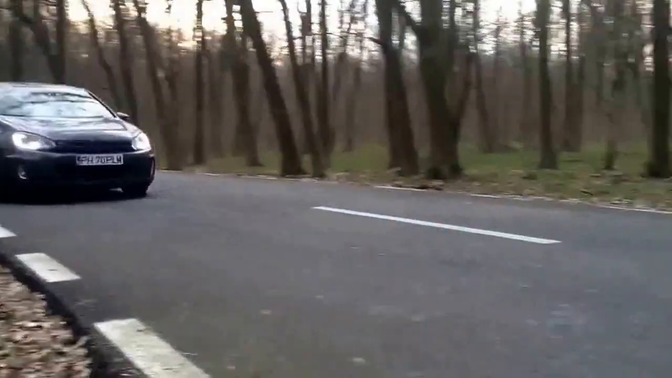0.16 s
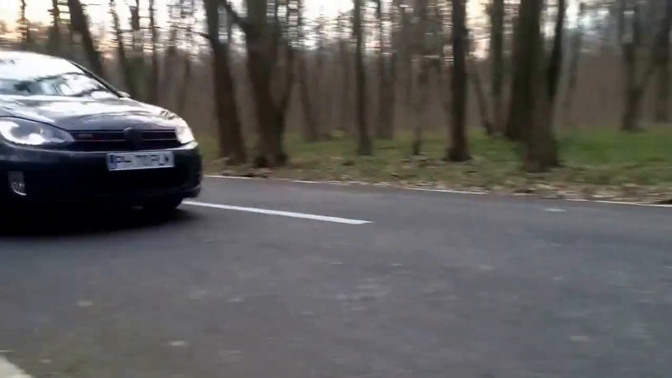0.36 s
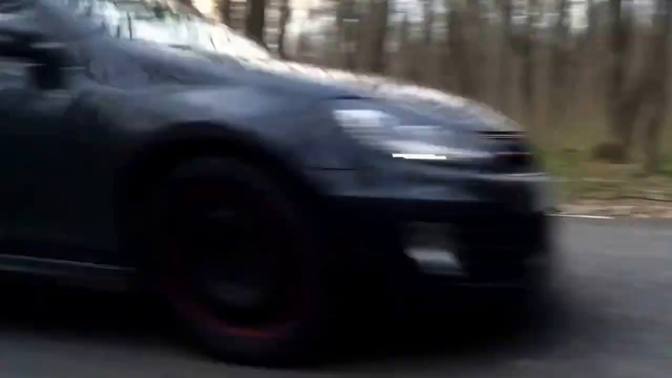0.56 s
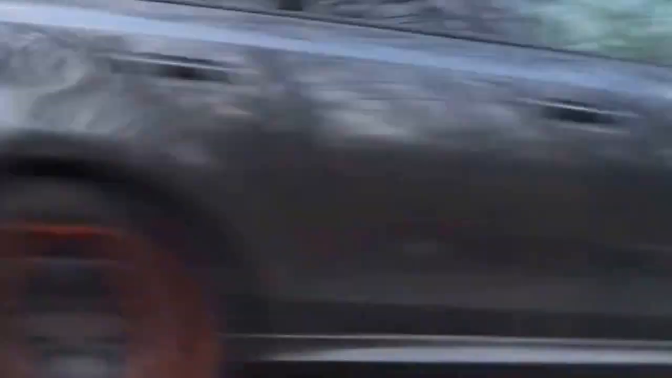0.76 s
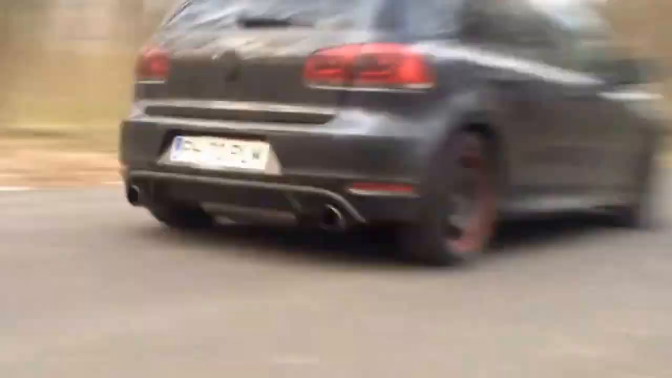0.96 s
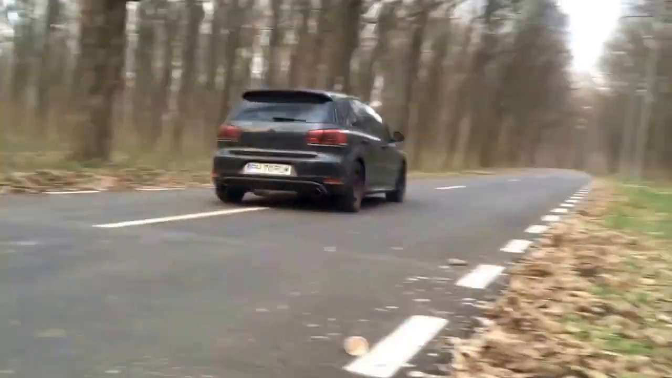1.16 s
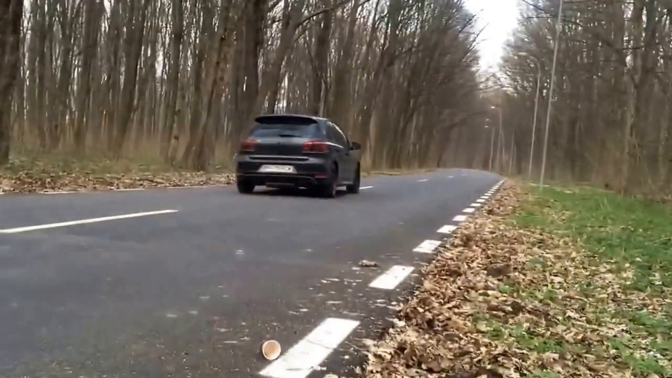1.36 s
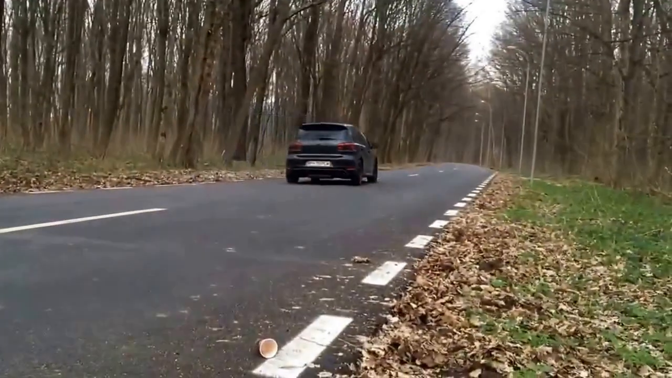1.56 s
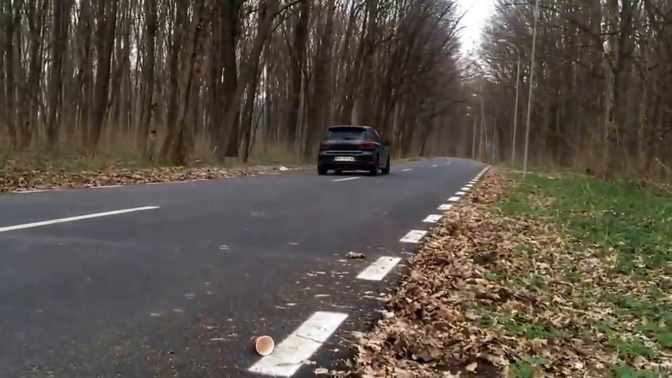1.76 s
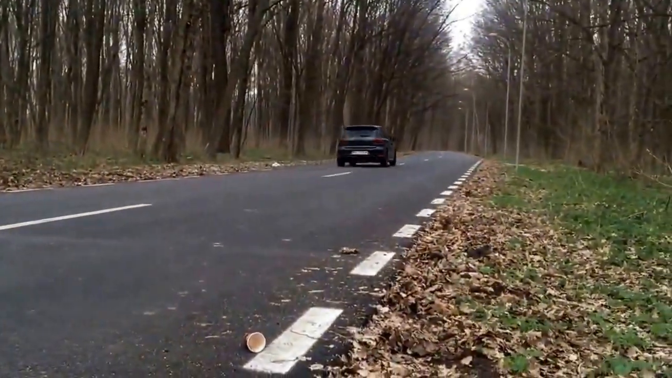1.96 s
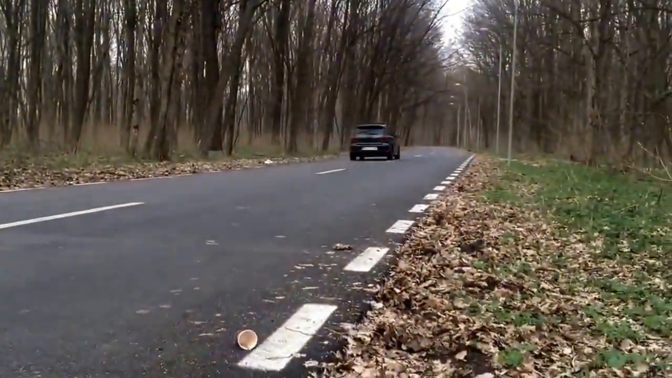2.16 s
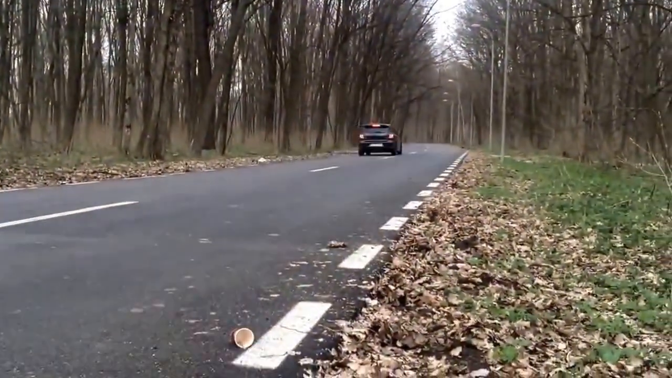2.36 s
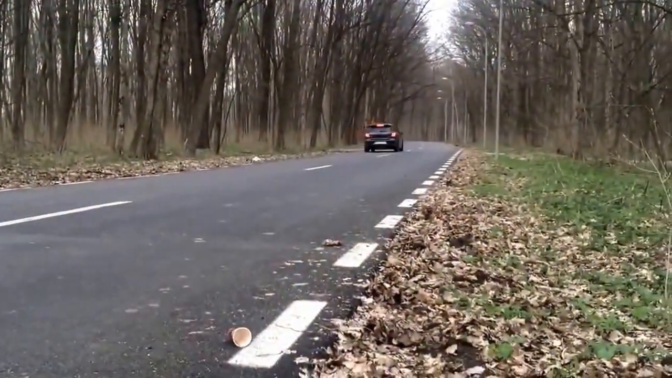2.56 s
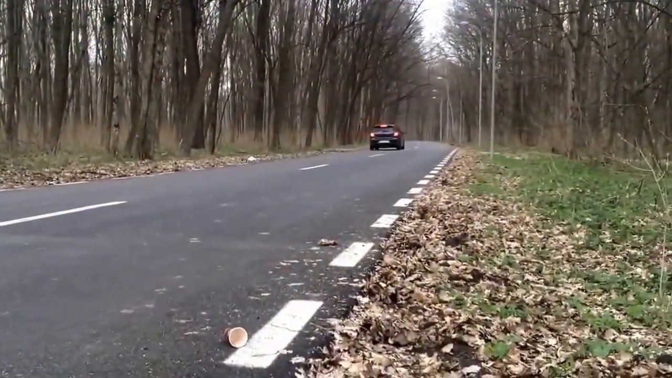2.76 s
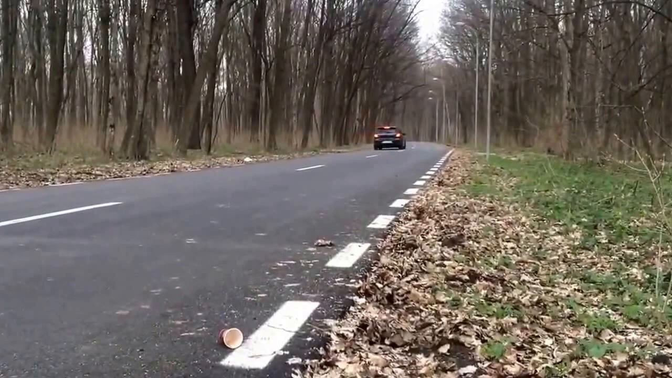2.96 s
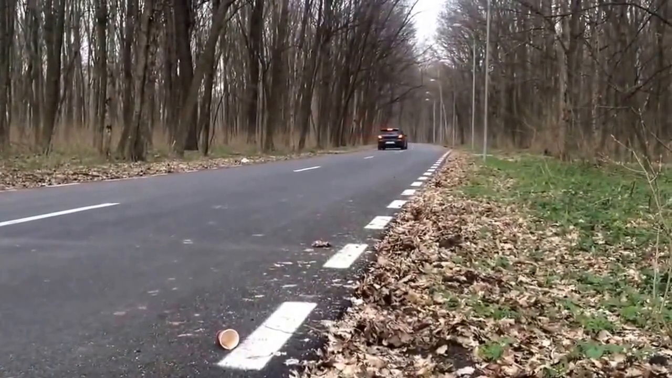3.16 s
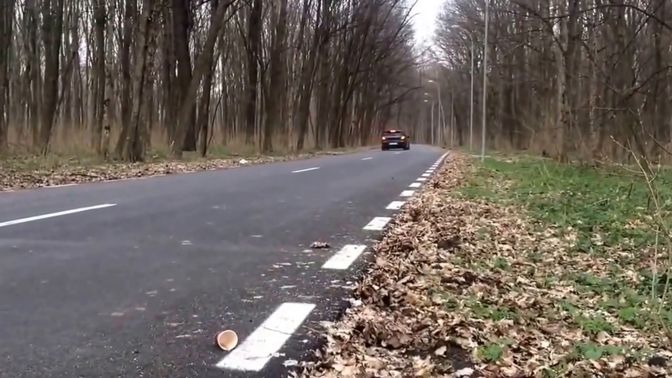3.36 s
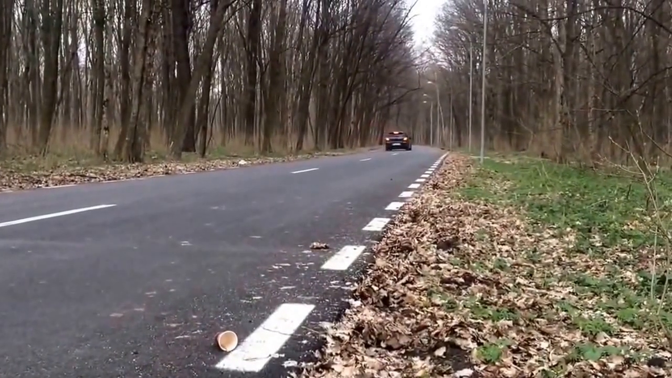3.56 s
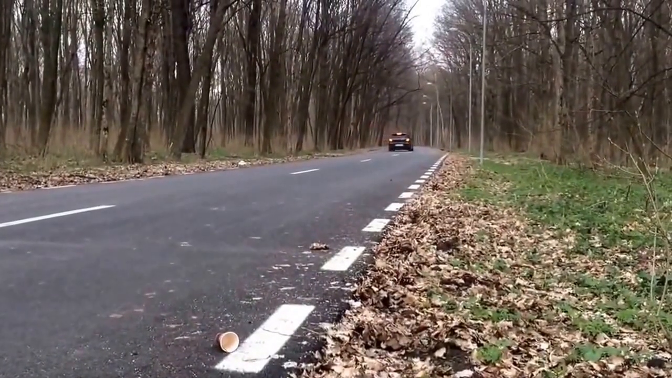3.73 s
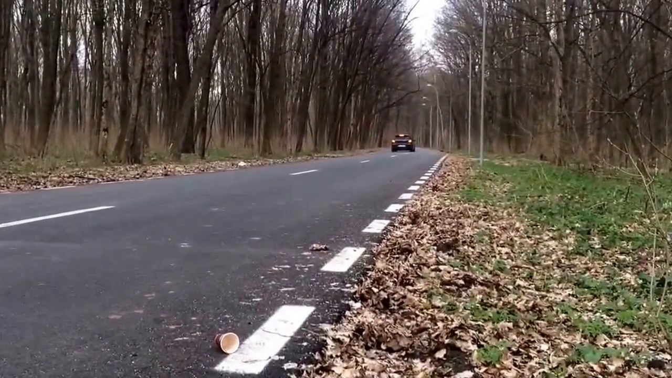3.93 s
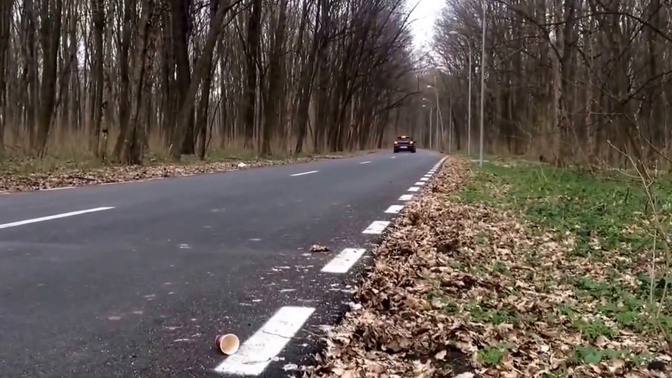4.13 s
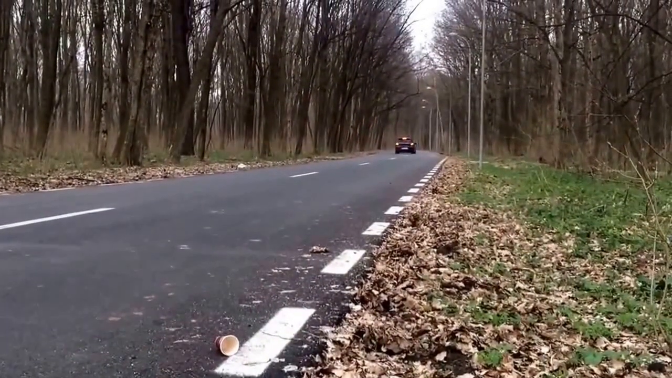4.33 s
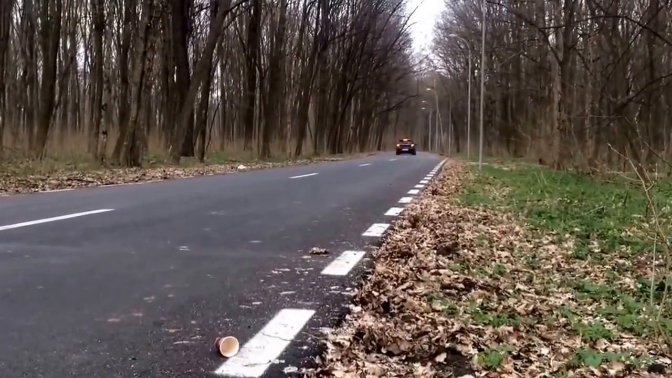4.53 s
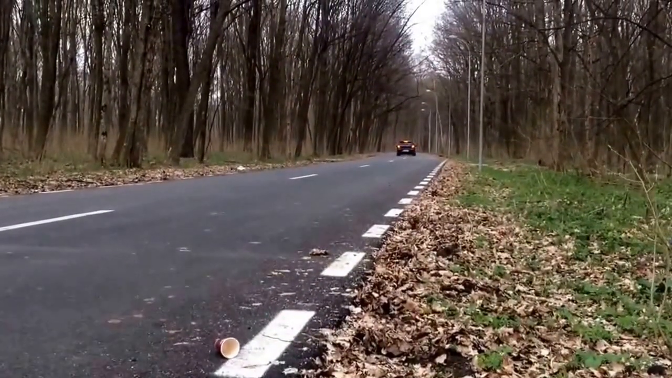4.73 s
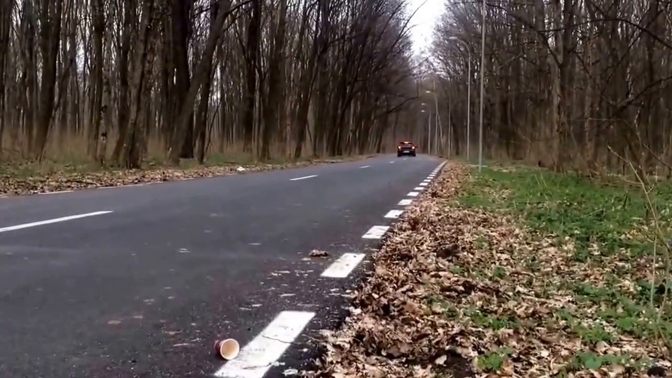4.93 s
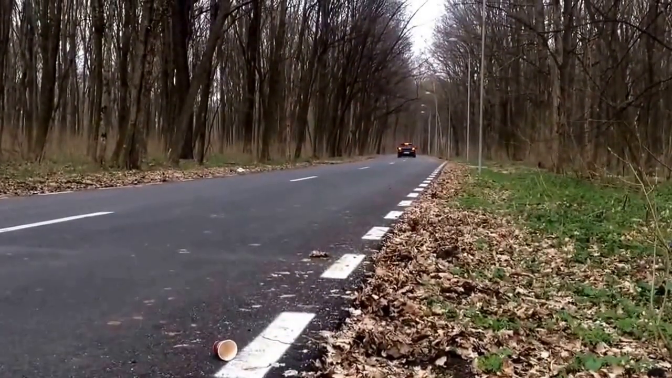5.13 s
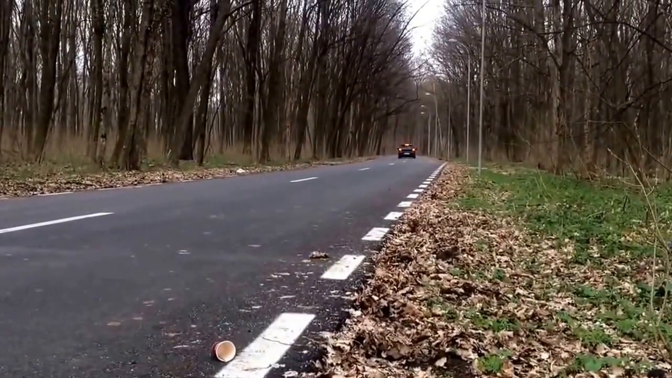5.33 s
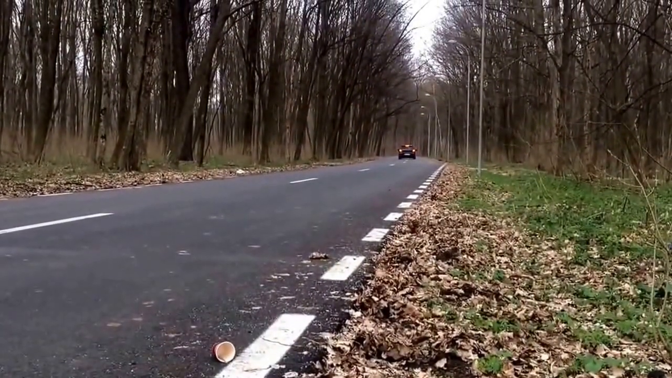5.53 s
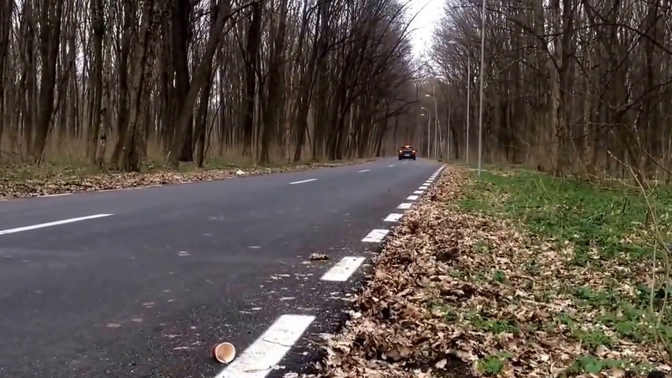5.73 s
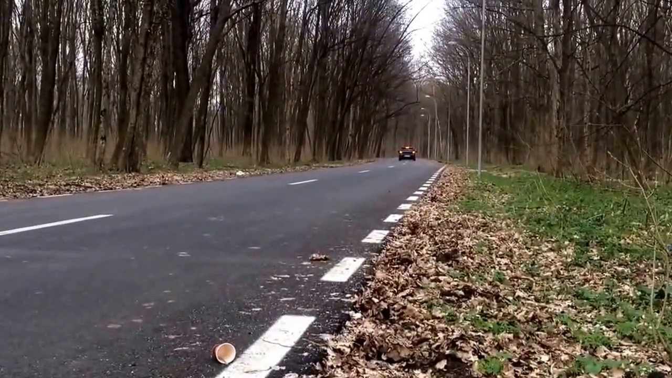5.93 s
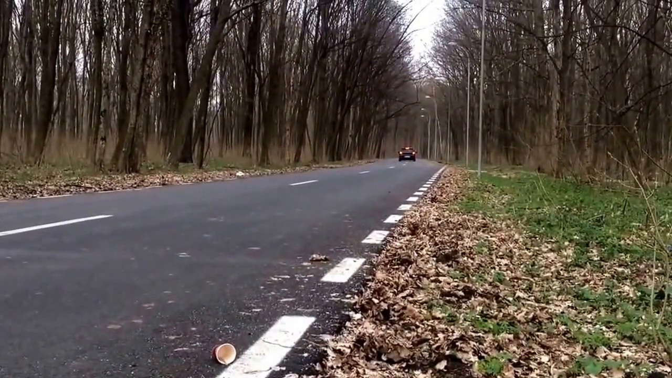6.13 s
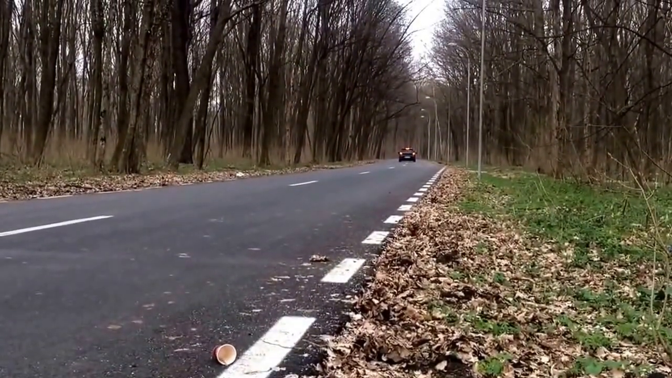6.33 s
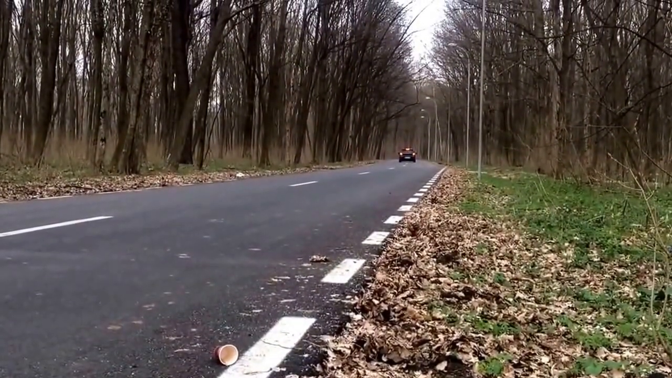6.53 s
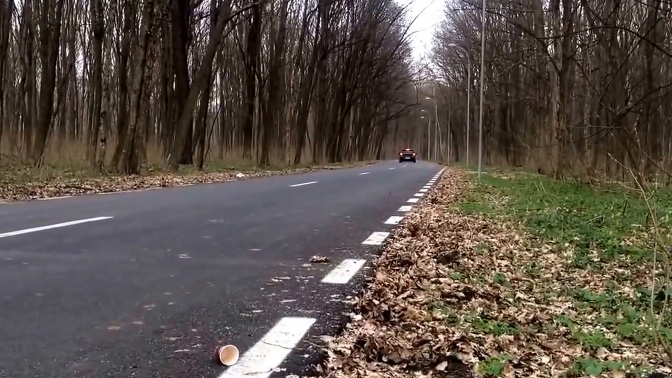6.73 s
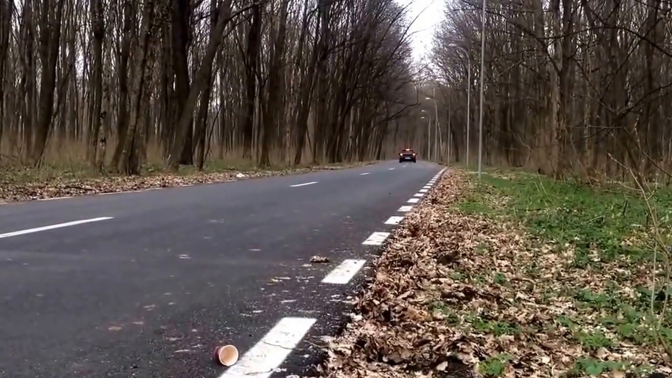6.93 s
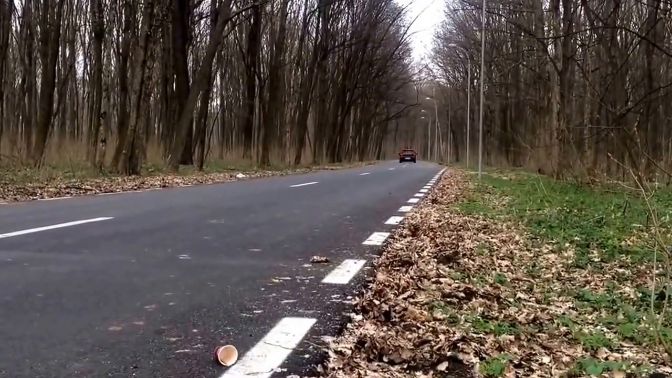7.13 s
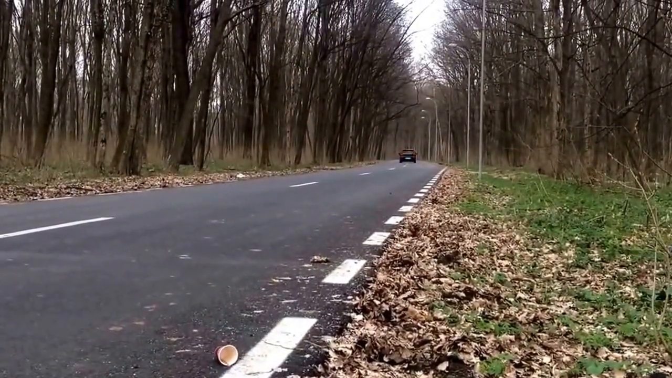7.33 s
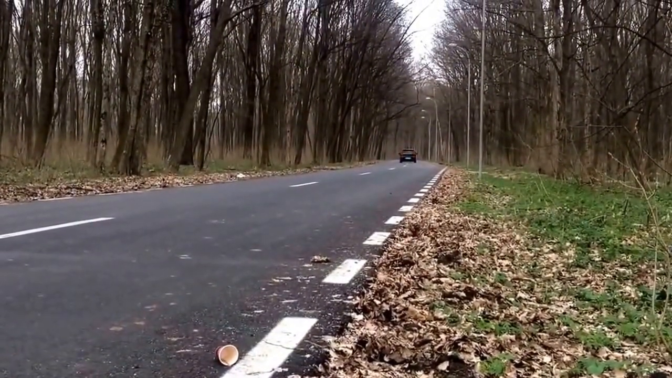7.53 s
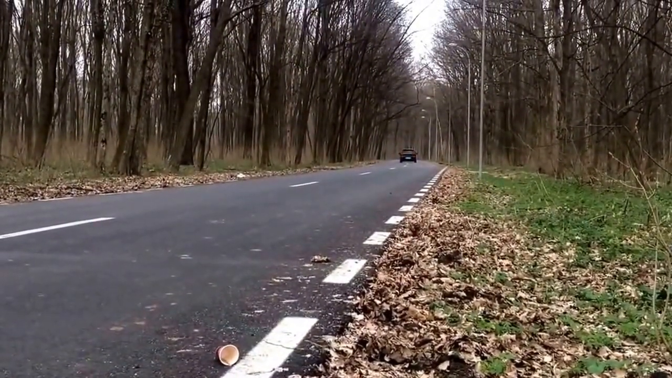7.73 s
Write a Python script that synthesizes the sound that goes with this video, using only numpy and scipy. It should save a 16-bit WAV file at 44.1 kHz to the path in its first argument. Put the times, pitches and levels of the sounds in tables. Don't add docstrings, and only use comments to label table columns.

```python
import sys
import numpy as np
from scipy import signal
from scipy.io import wavfile

SR = 44100
rng = np.random.default_rng(int(sys.argv[2]) if len(sys.argv) > 2 else 0)


def to_wav(s):
    ch = np.atleast_2d(s).T
    pcm = np.round(np.clip(ch, -1, 1) * 32767)
    wavfile.write(sys.argv[1], SR, pcm.astype(np.int16))


def rack_gain(trim_db):
    fader = np.asarray(trim_db, float)
    return 10 ** (fader / 20)


N = 347940


def in_time(rows):
    s, *columns = np.transpose(rows)
    return [np.interp(np.arange(N) / SR, s, c) for c in columns]


def at_hz(points, hz):
    points_hz, points_db = np.transpose(points)
    return np.interp(np.log(hz), np.log(points_hz), points_db)


def window(start_s, end_s, attack_s, release_s):
    t = np.arange(N) / SR
    return np.clip((t - start_s) / attack_s, 0, 1) * np.clip((end_s - t) / release_s, 0, 1)


def rms_one(x):
    return x / np.sqrt(np.mean(x ** 2) + 1e-20)


def drift(rate_hz):
    r = np.exp(-80 * np.pi * rate_hz / SR)
    white = rng.standard_normal(N // 40 + 2002)
    slow = signal.lfilter([1], [1, -2 * r, r * r], white)[2000:]
    return np.interp(np.arange(N) / 40, np.arange(len(slow)), rms_one(slow))


def butter(x, hz, kind, order=2):
    return signal.sosfilt(signal.butter(order, hz, kind, fs=SR, output="sos"), x)


def bands(spectrum):
    low_hz, high_hz = spectrum[0][0], spectrum[-1][0]
    edges = np.geomspace(low_hz, min(high_hz, 17000), round(3 * np.log2(high_hz / low_hz)))
    white = rng.standard_normal((2, N))
    out = []
    for k, (a, b) in enumerate(zip(edges, edges[1:])):
        hz = np.sqrt(a * b)
        out.append((hz, rack_gain(at_hz(spectrum, hz)) * butter(white[k % 2], [a, b], "band")))
    power = sum(np.mean(band ** 2) for hz, band in out)
    return [(hz, band / np.sqrt(power)) for hz, band in out]


# time_s, firings_per_s
ENGINE_SPEED = [(0, 133), (.14, 161), (.28, 179.7), (.378, 188), (.53, 173), (.56, 149.8), (.655, 145.6),
                (.76, 153.5), (.967, 132.7), (1.24, 128), (1.377, 129), (1.51, 132), (1.63, 130),
                (1.95, 103), (2.25, 88), (2.68, 95), (3.06, 89.6), (5.3, 34)]
# time_s, level_db, fall_per_order_db
EXHAUST_EFFORT = [(0, -30.5, -8.5), (.28, -22, -9.5), (.4, -21, -6), (.658, -7.5, -5.5), (.74, -18, -6),
                  (.83, -13.5, -4.5), (.97, -14.5, -4.5), (1.02, -22, -4), (1.16, -17, -3.1),
                  (1.3, -20.5, -2.6), (1.37, -23.5, -12.5), (1.68, -26, -8.5), (1.85, -28, -9),
                  (2.0, -37, -10), (2.68, -37.5, -10.5), (3.76, -49, -4.5), (5.0, -49, -4),
                  (5.3, -61, -1.5)]
# start_s, end_s, level_db, fall_per_order_db
FIRING_CUTS = [
    (0.399, 0.659, -14.5, 3),
    (1.376, 1.661, -10.5, -20),
]
# freq_hz, gain_db
TAILPIPE = [(30, -4), (90, -0.5), (165, 1), (240, -4.5), (370, 1.5), (520, 0), (800, 2), (950, -25.5)]


def exhaust():
    cylinder_db, paired_db = np.array([.6, -.4, -.5, .3]), 3.5
    firing_s = .6585
    uneven, uneven_coming, uneven_coast = .21, .4, .19
    abreast_s, dip_speedup_hz_s2 = .8, 750
    echo_share, echo_depth = .67, 1.3
    t, (rate,), (level_db, fall_db) = np.arange(N) / SR, in_time(ENGINE_SPEED), in_time(EXHAUST_EFFORT)
    for start_s, end_s, cut_db, duller_db in FIRING_CUTS:
        cut = window(start_s, end_s, .04, .011)
        level_db = level_db + cut_db * cut
        fall_db = fall_db + duller_db * cut

    climb_hz_s = np.where(t < abreast_s, 3000, 230)
    dip_hz = 130 + np.abs(t - abreast_s) * climb_hz_s + dip_speedup_hz_s2 * (t - abreast_s) ** 2
    behind = window(1.09, 9, .12, 1)
    coast = window(1.9, 9, .4, 1)
    spread = np.where(t < FIRING_CUTS[0][0], uneven_coming, uneven + (uneven_coast - uneven) * coast)

    turns = np.cumsum(rate) / SR
    turns += 1 - turns[round(firing_s * SR)] % 1
    firings = np.arange(int(turns[-1]) + 2)
    draws = rng.standard_normal((2, 1000))
    strength_chance, time_chance = [spread * np.interp(turns, firings + .5, d[firings]) for d in draws]
    early_rad = .55 * time_chance
    pattern_db = np.interp(turns, firings + .5, cylinder_db[firings % 4])
    pattern_db = pattern_db + paired_db * np.sin(np.pi * turns) / 2
    out = 0
    for k in range(1, 10):
        sharp = min(k - .6, 1.9)
        strength = rack_gain(pattern_db * sharp) * (1 + strength_chance * sharp)
        road = np.abs(1 + echo_share * np.exp(1j * np.pi * k * rate / dip_hz)) / (1 + echo_share)
        coast_db = (k == 2) * 2.5 + (k > 2) * -3
        pipe_db = at_hz(TAILPIPE, k * rate) + coast * coast_db + (k == 2) * -8 * (behind - coast)
        order_level = rack_gain(level_db + fall_db * (k - 1) ** .89) * road ** echo_depth * rack_gain(pipe_db)
        wave = np.sin(k * (2 * np.pi * turns + early_rad))
        out = out - np.sqrt(2) * order_level * strength * wave
    out = out * window(-1, 5.45, 1, .15)

    puffs = rng.standard_normal(N) * np.exp(-3 * (turns % 1))
    rasp = rms_one(butter(puffs, (430, 880), "band", order=3))
    burble = rms_one(butter(puffs, (190, 350), "band", order=3))
    out = out + rack_gain(-27) * window(.75, 1.36, .25, .07) * rasp
    return out + rack_gain(-61) * window(3.8, 5.7, .5, .5) * burble


# freq_hz, density_db_per_hz
TREAD_SPECTRUM = [(120, -33), (200, -3), (358, -9), (437, -10), (544, -7.5), (768, -8), (938, -4.5),
                  (1350, -2), (1590, -8.5), (2790, -19), (3000, -21), (3740, -25), (5190, -37),
                  (15400, -61.5)]
BALANCE_BANDS_HZ = [450, 1250, 3600, 8000, 15000]
BALANCE_DB = [
    [-7],
    [0],
    [-15],
    [-34],
    [-42],
]
# (highest abreast, lowest near 2.9 s, partly back as the roar
TYRE_PASS = [(0, -34.5, -23.5), (.08, -32, -20.5), (.33, -26, -16.5), (.62, -24.5, -13.5), (.8, -27, -9),
             (1.0, -32, -14.5), (1.11, -36, -10), (1.34, -37.5, -21), (1.375, -39.5, -13),
             (1.54, -40.5, -12), (1.76, -37.5, -22), (2.2, -38.5, -35.5), (2.85, -44, -39.5),
             (3.15, -41, -37.5), (4.1, -48.5, -36), (5.0, -58.5, -29), (6.1, -74.5, -24), (7.6, -84.5, -26)]


def tyres():
    patchy_db, gust_db = .9, .5
    roar_db, bright_db = in_time(TYRE_PASS)
    drone_db = -7 + .24 * bright_db - .1 * roar_db
    sizzle_db = -.9 + .42 * bright_db
    shares = np.array([drone_db, 0 * roar_db, sizzle_db, bright_db, 1.3 * bright_db]) - BALANCE_DB
    out, together = 0, drift(3.3)
    for hz, band in bands(TREAD_SPECTRUM):
        weights = [np.interp(np.log(hz), np.log(BALANCE_BANDS_HZ), one) for one in np.eye(5)]
        flicker_db = gust_db * together + patchy_db * drift(12)
        out = out + band * rack_gain(roar_db + weights @ shares + 1.5 + flicker_db)
    return out


# freq_hz, density_db_per_hz
RUMBLE_SPECTRUM = [(20, -13.5), (40, -7.5), (80, 0.5), (150, -2), (230, -13), (320, -29.5)]


def rumble():
    lumpy_db = 2.2
    gust_s, gust_db, rise_s_per_20db, fall_s_per_20db = .78, -28.5, .4, .54
    lull_s, lull_db, lull_width_s = 1.33, -13, .15
    t = np.arange(N) / SR
    road_db = -28 + .49 * in_time(TYRE_PASS)[0]
    road_db += -12 * (1 - window(.37, 9, .035, .1))
    road_db += lull_db * np.exp(-((t - lull_s) / lull_width_s) ** 2)
    slope_s = np.where(t < gust_s, rise_s_per_20db, fall_s_per_20db)
    level = rack_gain(road_db) + rack_gain(gust_db - 20 * np.abs(t - gust_s) / slope_s)
    return sum(band * level * rack_gain(3 + lumpy_db * drift(5.9)) for hz, band in bands(RUMBLE_SPECTRUM))


# freq_hz, density_db_per_hz
FLOOR_SPECTRUM = [(200, -2.5), (400, 1), (900, -5), (2600, -5.5), (3400, -9), (8000, -13.5), (15400, -16.5)]


def still_air():
    return rack_gain(-75) * sum(band for hz, band in bands(FLOOR_SPECTRUM))


# time_s, pitch_hz, level_db
GEAR_WHINE = [(0.049, 901, -48), (.2, 946, -32.5), (.3, 1003, -35), (.4, 1060, -33.5), (.5, 1090, -41)]


def whine():
    waver_hz = 13
    hz, db = in_time([(0, 890, -52), *GEAR_WHINE, (.56, 1086, -93)])
    level = np.sqrt(2) * rack_gain(db + 1.8 * drift(25))
    return level * np.sin(2 * np.pi * np.cumsum(hz + waver_hz * drift(30)) / SR)


# time_s, peak_db, width_ms
SHIFT_POPS = [(0.4099, -6, 0.85), (0.4316, -5, 0.76), (0.4532, -6, 0.98), (0.4756, -11.5, 1.1),
              (0.496, -14.5, 1.1), (0.522, -20, 2), (0.541, -14.5, 1.5), (0.5839, -10.5, 0.83),
              (0.609, -6, 1.01), (.623, -7, 1.2), (0.638, -10.5, 1.2), (0.6492, -9, 1.5)]


def pops():
    out, t = np.zeros(N), np.arange(int(.02 * SR)) / SR
    for s, db, width_ms in SHIFT_POPS:
        x = t / (width_ms / 1000)
        i = round(s * SR)
        out[i:][:len(t)] -= rack_gain(db) * x ** 2 * np.exp(2 - 2 * x)
        out[:i][-len(t):] += .32 * rack_gain(db) * np.exp(-x[::-1] / 2.5)
    return butter(butter(out, 25, "high", order=1), 2500, "low")


def lift_off_hiss():
    start_s, level_db, t60_s = 1.36, -48.5, .78
    t = np.arange(N) / SR - start_s
    hiss = rms_one(butter(rng.standard_normal(N), [4500, 13000], "band"))
    return rack_gain(level_db - 60 * np.abs(t) / t60_s) * (t > 0) * hiss


def shudder():
    start_s, length_s, start_hz, end_hz, level_db = 1.63, .27, 105, 25, -37
    u = np.clip((np.arange(N) / SR - start_s) / length_s, 0, 1)
    hz = start_hz + (end_hz - start_hz) * u
    return rack_gain(level_db) * np.sin(np.pi * u ** .592) * np.sin(2 * np.pi * np.cumsum(hz) / SR)


# time_s, peak_db, pitch_hz
GRIT = [
    (2.283, -46, 5000),
    (3.075, -50, 5000),
    (3.279, -31, 1250),
    (3.335, -36, 1250),
    (3.99, -56, 6000),
    (4.487, -40, 1250),
]


def stones():
    out, t = np.zeros(N), np.arange(600) / SR
    for s, db, hz in GRIT:
        out[round(s * SR):][:len(t)] -= rack_gain(db - 60 * t * hz / 24) * np.sin(2 * np.pi * hz * t)
    return out


# start_s, length_s, start_hz, level_db
CHIP_NOTES = [
    (3.065, .034, 2800, -46),
    (3.47, .05, 2742, -53),
    (3.92, .05, 2804, -52),
]
PEEP_NOTES = [(2.645, 0.028, 2876, -47), (2.71, 0.023, 2850, -58), (3.02, .02, 2800, -60),
              (3.14, .031, 2780, -63), (3.49, .046, 2740, -65), (3.98, 0.035, 2738, -63),
              (5.2, 0.048, 2300, -72), (6.13, 0.097, 2334, -71), (6.3, 0.62, 2345, -74),
              (6.33, 0.036, 2330, -73), (6.47, .07, 2344, -70), (6.885, 0.029, 2365, -72),
              (6.92, .2, 2340, -80.5), (6.99, .02, 2345, -70), (7.07, 0.064, 3435, -80),
              (6.28, .05, 5120, -79), (6.632, .05, 5120, -80)]
SEEP_NOTES = [
    (5.26, .1, 7150, -81),
    (5.48, .1, 7270, -81),
    (6.23, .07, 7020, -77),
    (6.58, .07, 7020, -76.5),
    (7.11, .078, 7800, -83),
]
SWOOP_NOTES = [
    (5.455, .058, 4700, -68),
    (5.64, .1, 5250, -72.5),
    (5.875, .088, 4950, -72.5),
]
DROP_NOTES = [
    (6.265, .018, 6050, -73),
    (6.612, .022, 6150, -73),
]
SLUR_NOTES = [
    (5.28, .04, 2250, -73),
    (5.35, .05, 2150, -72),
    (5.74, .08, 2174, -72),
    (5.93, .07, 2160, -69),
    (6.55, .038, 2400, -66),
    (7.37, .06, 2300, -73),
]
# start_s, length_s, start_hz, level_db
PIPED_ACCENTS = [
    (6.068, .034, 2320, -57),
    (6.385, .06, 2503, -54),
    (6.745, .065, 2480, -58.5),
    (6.828, .03, 2360, -64.5),
]


def songs():
    species = [(.88, 1.1, CHIP_NOTES), (.96, 1.05, PEEP_NOTES), (.992, .8, SEEP_NOTES),
               (.66, .75, SWOOP_NOTES), (.84, .8, DROP_NOTES), (1.31, 2, SLUR_NOTES)]
    pipe_hz, flick_s, flick_hz, flick_db = 2335, .014, 1900, -7
    notes = []
    for glide, bend, rows in species:
        notes += [(s, length_s, hz, hz * glide, db, bend) for s, length_s, hz, db in rows]
    for s, length_s, hz, db in PIPED_ACCENTS:
        notes.append((s, length_s, hz, pipe_hz, db, .45))
        notes.append((s - .85 * flick_s, flick_s, flick_hz, hz, db + flick_db, .7))
    return notes


def birds():
    echo_db, t60_s, flutter_db, waver_hz = -8, .9, 2.5, 25
    out, flutter, waver = np.zeros(N), rack_gain(flutter_db * drift(31)), waver_hz * drift(58)
    for s, length_s, start_hz, end_hz, db, bend in songs():
        u = np.arange(int(length_s * SR)) / (length_s * SR)
        span = slice(round(s * SR), round(s * SR) + len(u))
        hz = start_hz + (end_hz - start_hz) * u ** bend + waver[span]
        level = rack_gain(db - .5) * flutter[span] * np.sin(np.pi * u ** 1.03) ** .5
        out[span] += level * np.sin(2 * np.pi * np.cumsum(hz) / SR)
    t = np.arange(SR) / SR
    trunks = rng.standard_normal(SR) * rack_gain(3.6 * drift(40)[:SR] - 60 * t / t60_s) * (t > .015)
    trunks = butter(trunks, 5500, "low")
    return out + rack_gain(echo_db) * signal.fftconvolve(out, trunks / np.linalg.norm(trunks))[:N]


# settled_db, extra_at_stop_db, swell_db
SILENCER_LEVELS = [
    (-64, -3, 6.5),
    (-67, 11, 4.5),
]


def idle():
    silencer = (88, 60), (155, 70)    # pitch_hz, width_hz
    from_s, beat_s = 5, 7.322
    firings_per_s, extra_per_s, rate_settle_s, level_settle_s = 26, 4, .3, .7
    hunt_peak_s, hunt_period_s = 7.4, .504
    t = np.arange(N) / SR
    since = np.maximum(t - from_s, 0)
    turns = 2 * np.cumsum(firings_per_s + extra_per_s * np.exp(-since / rate_settle_s)) / SR
    turns = np.floor(turns - turns[round(beat_s * SR)])
    at = np.flatnonzero(np.diff(turns)) + 1
    clicks, out = np.zeros(N), 0
    clicks[at] = rack_gain(2.2 * rng.standard_normal(600)[:len(at)])
    clicks[at] *= rack_gain(-9 * (turns[at] % 2))
    hunt = np.cos(2 * np.pi * (t - hunt_peak_s) / hunt_period_s) * np.minimum(since, 1)
    for (hz, width_hz), (level_db, extra_db, swell_db) in zip(silencer, SILENCER_LEVELS):
        r = np.exp(-np.pi * width_hz / SR)
        poles = [1, -2 * r * np.cos(2 * np.pi * hz / SR), r * r]
        thuds = signal.lfilter([1, -1], poles, -clicks + 1e-18)
        thuds = rms_one(butter(thuds, 1.45 * hz, "low", order=4))
        out = out + rack_gain(level_db + extra_db * np.exp(-since / level_settle_s) + swell_db * hunt) * thuds
    out = out * rack_gain(-11 * window(6.22, 7.2, .06, .03))
    return out * window(from_s - .3, 9, .3, .1)


def scene():
    engine = exhaust() + whine() + pops() + lift_off_hiss() + shudder() + idle()
    road = tyres() + rumble() + stones()
    return (engine + road + birds() + still_air())[None]


def low_pass(x):
    return signal.sosfilt(signal.butter(12, 15590, fs=SR, output="sos"), x)


def record(dry):
    mix = butter(dry, 38, "high")
    return low_pass(mix)


dry = scene()
out = record(dry)
to_wav(out)
```